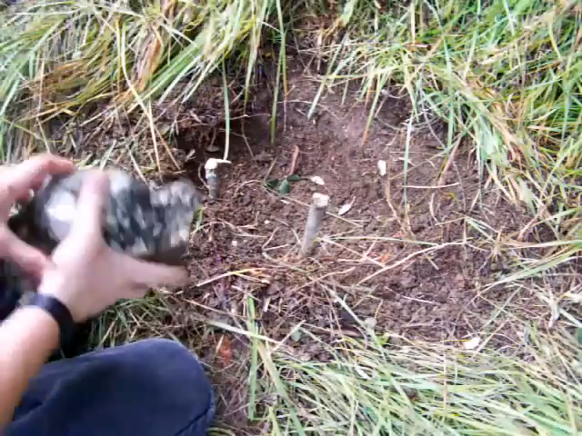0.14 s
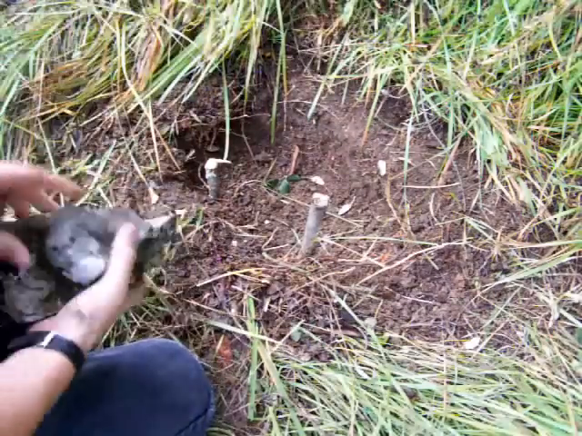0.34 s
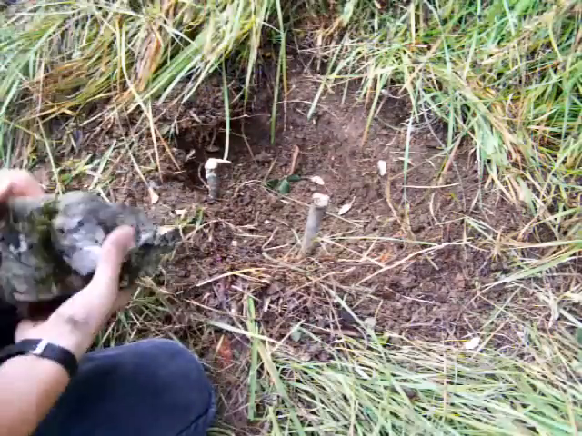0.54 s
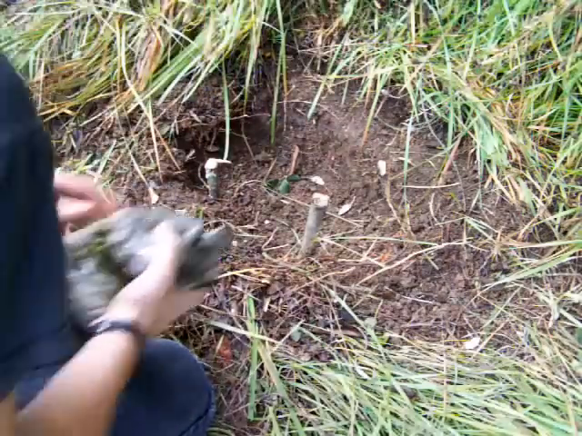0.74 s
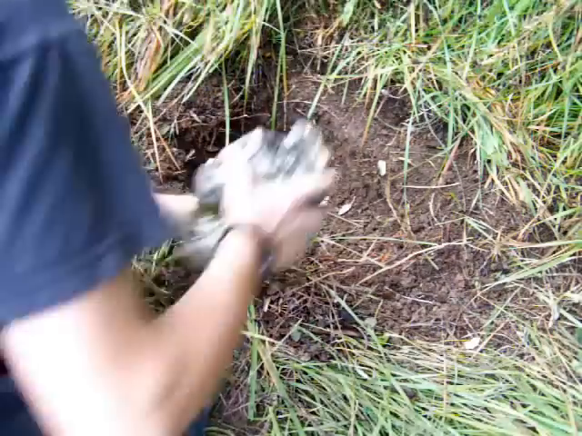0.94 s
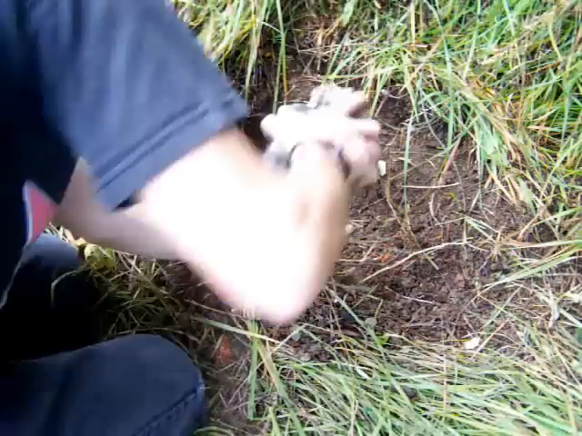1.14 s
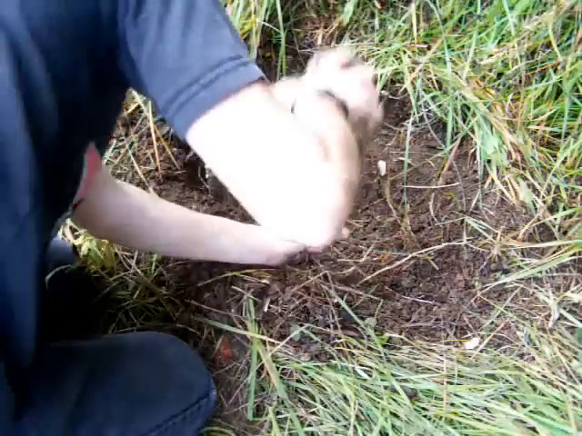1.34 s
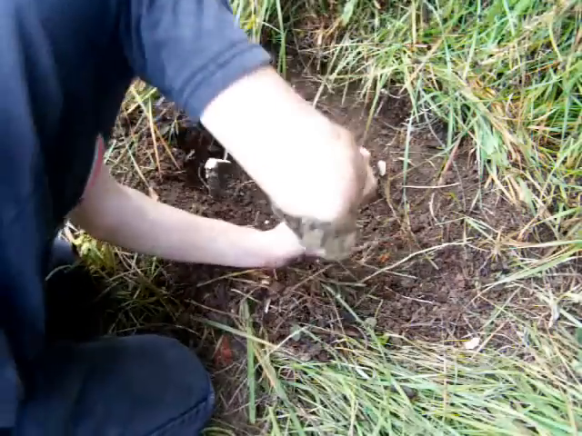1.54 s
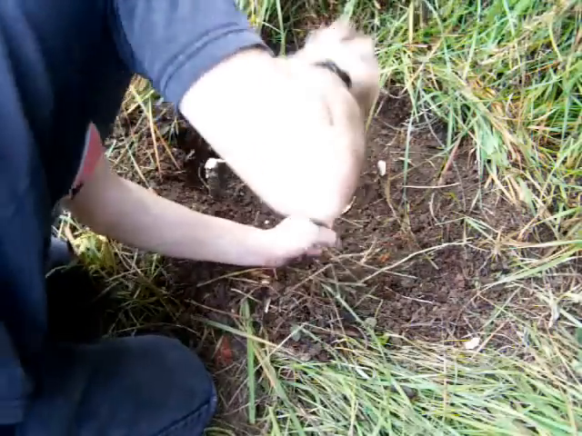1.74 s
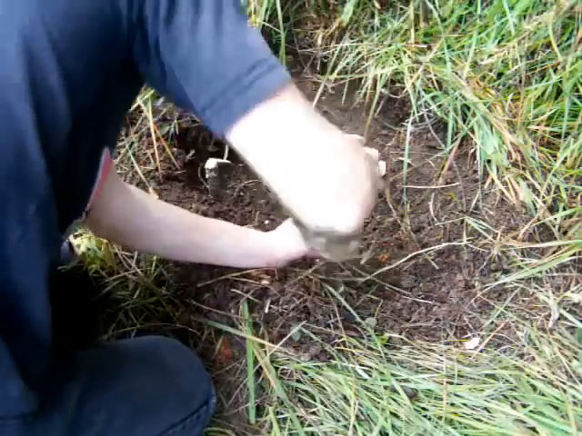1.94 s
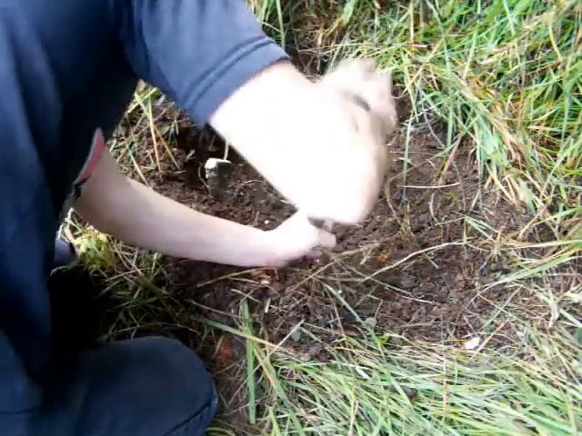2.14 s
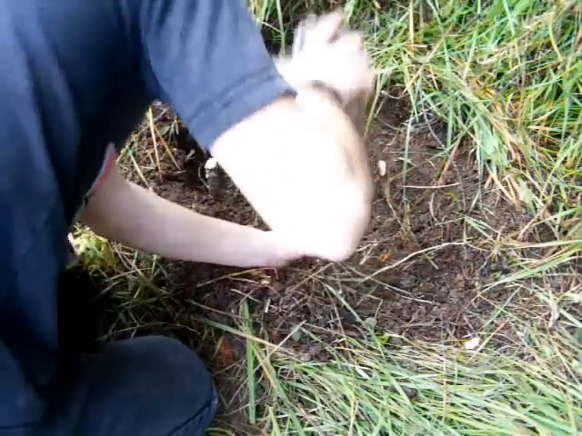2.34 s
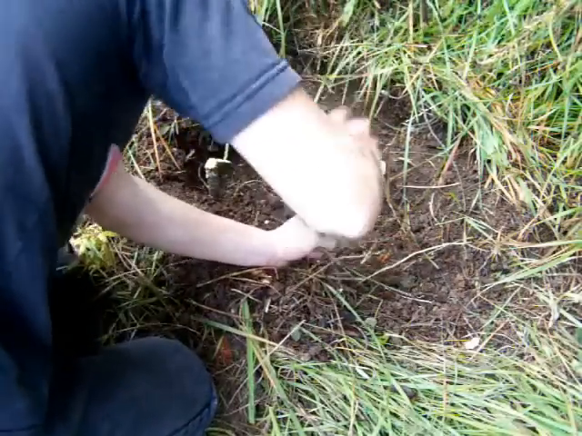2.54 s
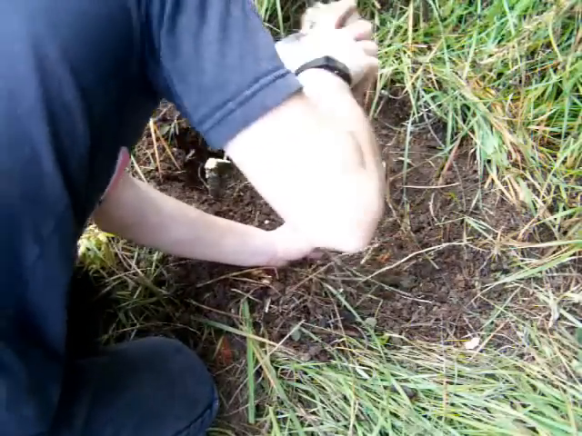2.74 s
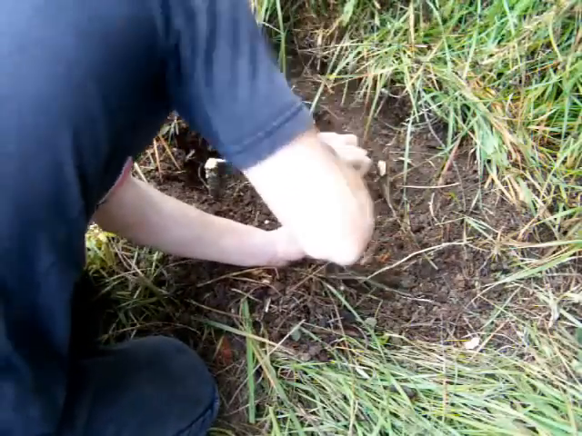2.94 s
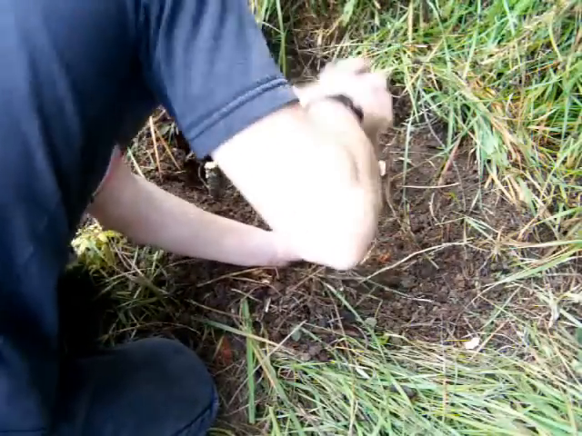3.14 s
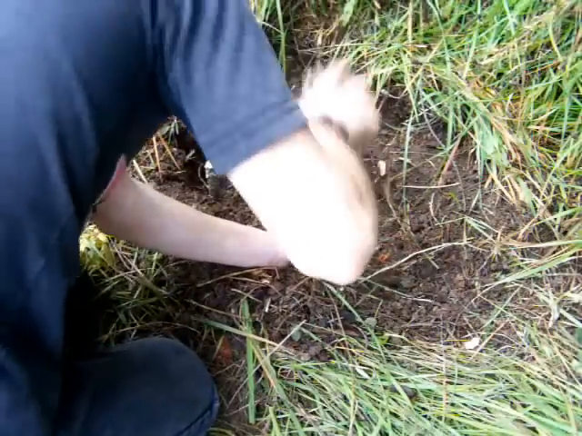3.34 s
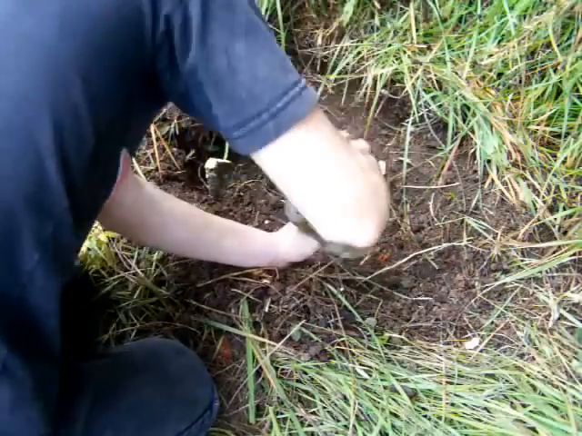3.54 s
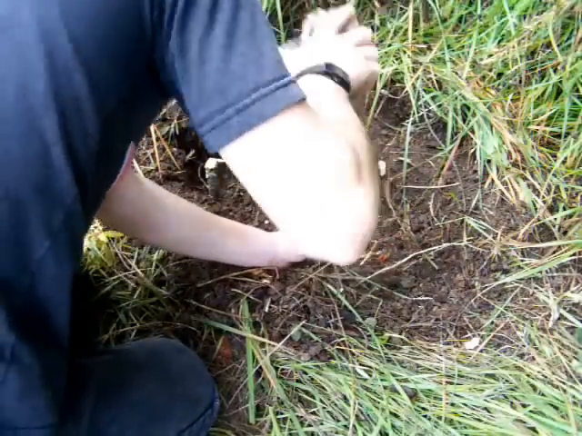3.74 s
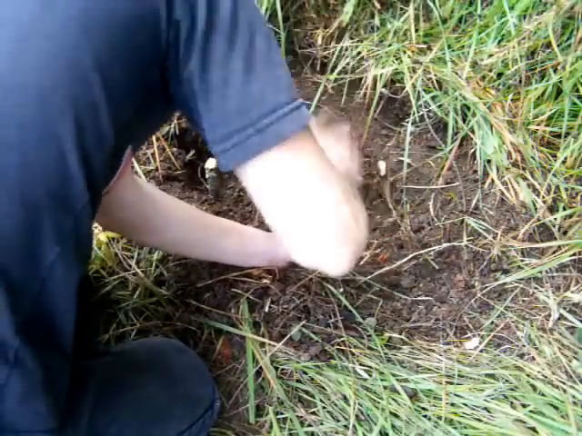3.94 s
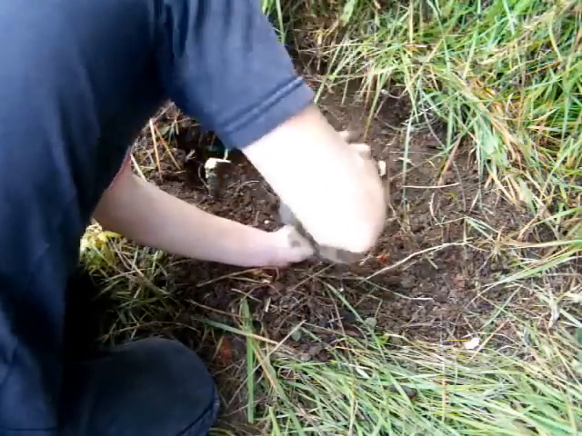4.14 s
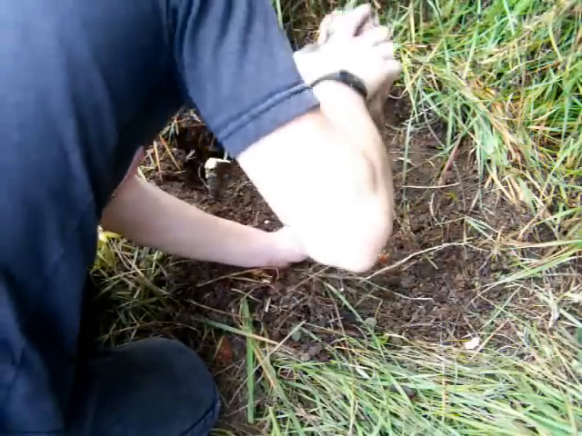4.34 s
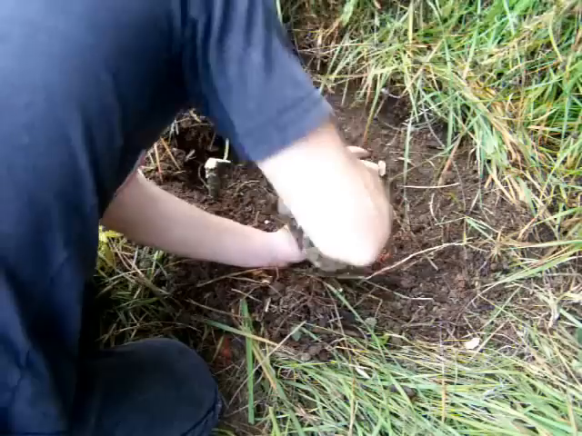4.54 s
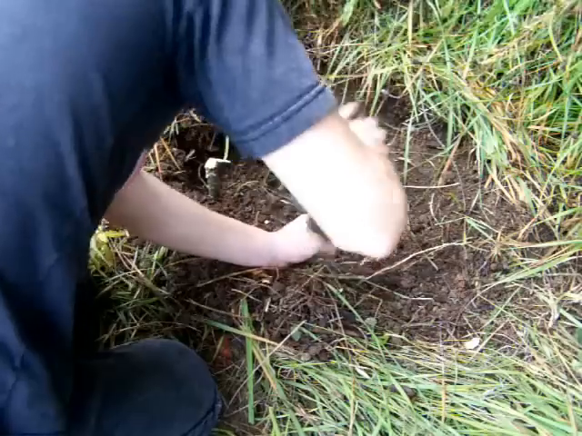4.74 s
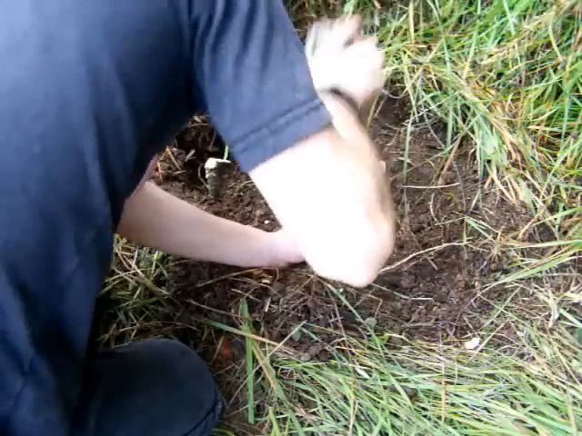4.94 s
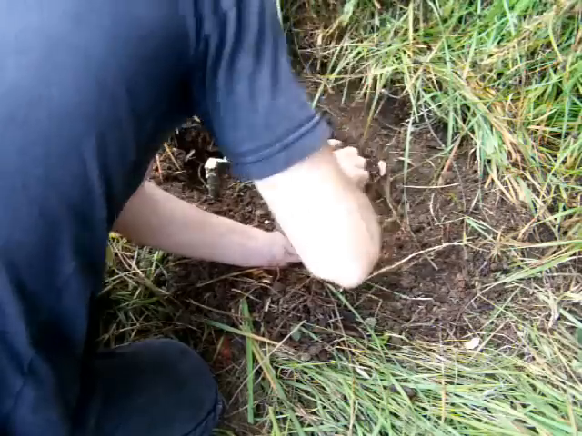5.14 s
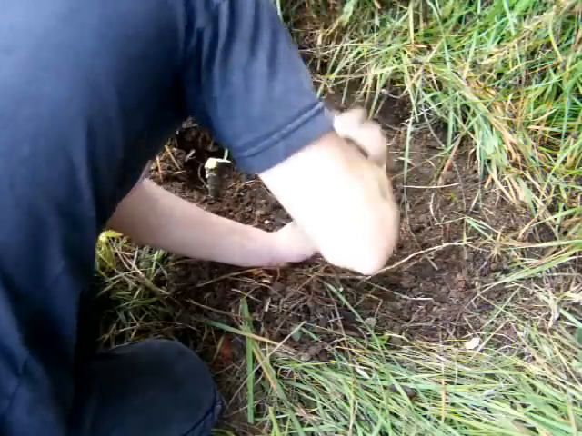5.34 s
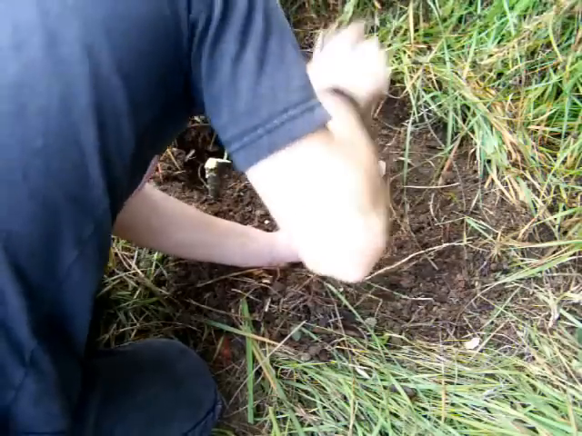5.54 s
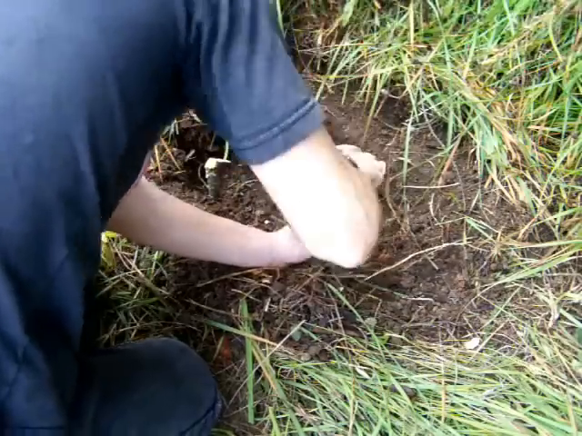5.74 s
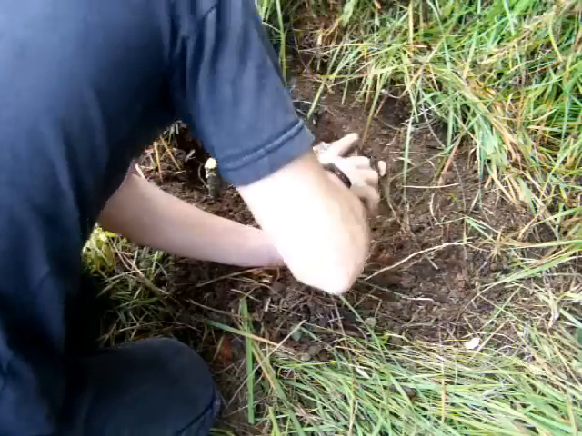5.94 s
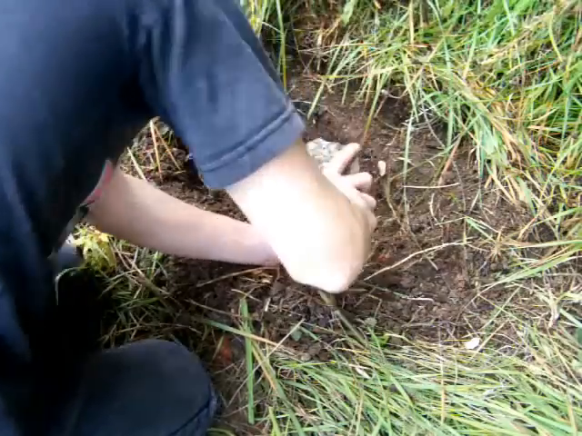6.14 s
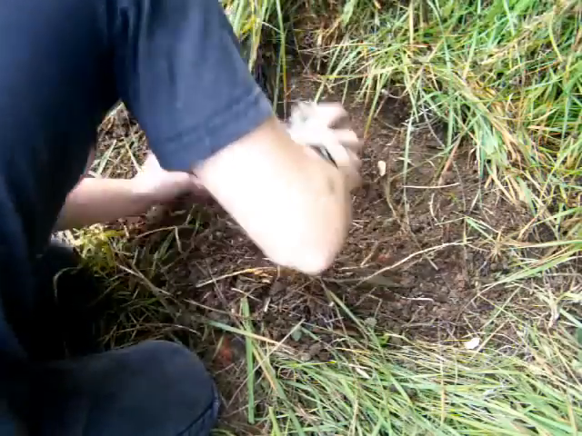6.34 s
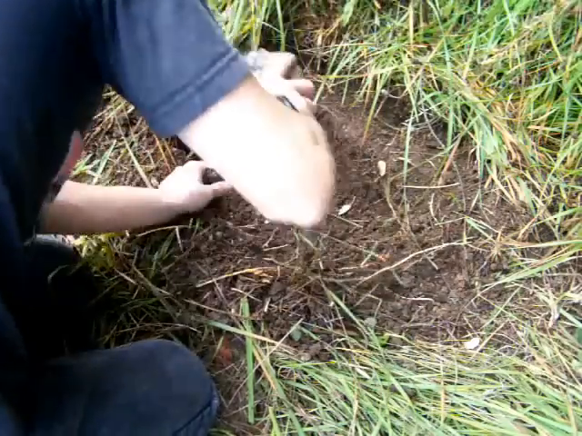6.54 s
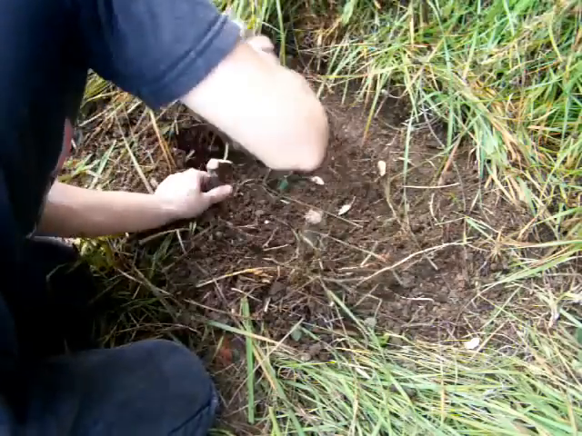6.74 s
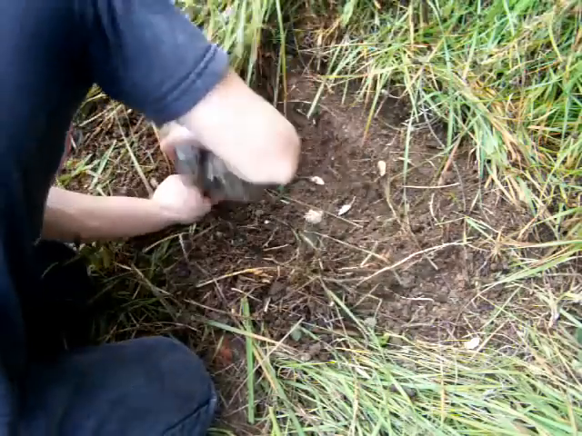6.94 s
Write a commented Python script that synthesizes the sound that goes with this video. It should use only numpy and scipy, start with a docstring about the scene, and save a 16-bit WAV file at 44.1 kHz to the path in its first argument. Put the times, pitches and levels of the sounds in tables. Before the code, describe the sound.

Close outdoor sound of a stone driving a wooden stake into soil. Grass and cloth rustle and dry stems snap first, then nine steady blows fall about half a second apart, each a splintery crack with a dull woody knock and short low thump. Rustling follows, a faint distant dove coos once, and one thinner blow ends it. Quiet rumble and leaf hiss lie underneath.

```python
"""A hand-held stone drives a short wooden stake into damp soil, outdoors, close to the microphone.
Each blow is a splintery crack (clicks ringing the stone), a dull knock and slower waves through the ground
(fading sines). Stems snap with short ticks and fizz. Grass rustles as tiny ringing clicks, and clothing as
filtered noise, when the arms move or a blow shakes the grass. A far dove coos once, a gliding sine,
over a quiet rumble and a hiss of leaves, both made of filtered noise."""
import sys
import numpy as np
from scipy import signal
from scipy.fft import rfft, irfft, next_fast_len
from scipy.io import wavfile

SR = 44100
rng = np.random.default_rng(int(sys.argv[2]) if len(sys.argv) > 2 else 0)


def inscribe(sig):
    """Save sig as 16-bit PCM at rate SR to the path in sys.argv[1].

    A 1-D sig is mono; a 2-D sig holds one channel per row.
    Samples are clipped to [-1, 1] before scaling.
    """
    pcm = np.round(np.clip(np.atleast_2d(sig).T, -1, 1) * 32767)
    wavfile.write(sys.argv[1], SR, pcm.astype(np.int16))


def decibels_to_gain(level_db):
    """Convert a level in decibels to a linear amplitude gain (20 dB per decade)."""
    exponent = np.asarray(level_db, float) / 20
    return 10 ** exponent


N = 308259   # length in samples, about 7 s

# far traffic and wind: (t/s, level/dB)
RUMBLE_LEVEL = [(0.0, -60), (0.43, -57), (1.26, -56), (1.5, -56.5), (3.5, -56.5), (6.99, -56.5)]
# tone colour of the outdoor air, relative: (f/Hz, level/dB per Hz)
AIR_COLOUR = [(15, -33.5), (25, -13.5), (49, 1), (81, 1.5), (212, -8.5), (411, -8), (1070, -17),
              (1980, -20), (2860, -22), (5540, -22), (7440, -28.5), (8210, -27), (8840, -49.5),
              (11500, -66)]
# grass brushed by an arm or shaken by a blow:
# (loudest t/s, level/dB, time to swell by 20 dB/ms, time to fade by 20 dB/ms)
GRASS_SWISHES = [(0.0, -43, 48, 298), (0.192, -43.5, 72, 28), (0.24, -48.5, 70, 110), (0.316, -48, 25, 200),
                 (0.432, -52.5, 40, 138), (0.56, -58, 40, 202), (0.81, -48.5, 84, 297),
                 (0.888, -40.5, 15, 11), (0.938, -38, 113, 207), (1.08, -50.5, 300, 900),
                 (1.388, -38, 33, 73), (1.469, -47, 11, 33), (1.632, -51.5, 160, 220), (1.71, -46, 8, 8),
                 (1.865, -43, 26, 95), (2.122, -51, 50, 65), (2.156, -49, 14, 8), (2.345, -47.5, 38, 112),
                 (2.424, -47.5, 48, 29), (2.596, -59.5, 35, 300), (2.84, -48.5, 23, 197),
                 (2.912, -51, 100, 46), (3.113, -60, 20, 150), (3.355, -51, 30, 100), (3.386, -51, 70, 35),
                 (3.418, -52.5, 15, 93), (3.636, -49, 8, 70), (3.918, -42.5, 20, 30),
                 (3.952, -40.5, 41, 29), (4.228, -55, 122, 9), (4.36, -57, 78, 8), (4.455, -46.5, 28, 155),
                 (4.684, -49, 20, 2), (4.74, -54.5, 8, 125), (4.868, -55, 80, 25), (5.025, -47, 30, 102),
                 (5.146, -56.5, 80, 700), (5.358, -59, 50, 56), (5.474, -50.5, 12, 20), (5.62, -46, 21, 41),
                 (5.693, -52, 110, 62), (5.84, -57.5, 45, 600), (5.965, -53.5, 300, 296),
                 (6.045, -49, 60, 400), (6.141, -44, 300, 111), (6.326, -49, 1, 16), (6.354, -39.5, 21, 50),
                 (6.41, -56.5, 100, 100), (6.562, -47.5, 7, 65), (6.75, -64, 600, 603),
                 (6.872, -52, 28, 202), (6.934, -43.5, 80, 92)]
# tone colour of rubbing grass, relative: (f/Hz, level/dB per Hz)
GRASS_COLOUR = [(880, -18.5), (1500, -12.5), (2320, -15.5), (4210, -7), (5420, -4.5), (6620, -10),
                (7510, -9), (8840, -5.5), (11500, -57.5), (19400, -120)]
# cloth moving: (t/s, level/dB)
CLOTH_LEVEL = [(0.0, -40.5), (0.068, -45.5), (0.26, -52.5), (0.4, -62), (0.52, -57), (0.7, -64),
               (0.82, -51.5), (1.242, -60.5), (1.4, -66.5), (4.97, -67.5), (5.19, -58.5), (5.44, -67.5),
               (5.9, -63), (6.08, -59), (6.3, -70), (6.99, -62.5)]
# tone colour of rubbing cloth, relative: (f/Hz, level/dB per Hz)
CLOTH_COLOUR = [(200, -11.5), (500, -5), (1150, -10.5), (1500, -7), (1800, -0.5), (2000, -4.5),
                (2200, -4.5), (2450, -7), (2800, -17.5), (3800, -3), (5000, -27)]
# stems and splinters snapping: (t/s, level/dB, f/Hz)
STEM_SNAPS = [(0.434, -35, 3790), (0.649, -36, 4300), (0.6787, -36, 3950), (0.6983, -36, 7150),
              (0.7085, -32, 5260), (0.7224, -39, 3520), (0.8113, -13.5, 4560), (0.8612, -25, 5000),
              (0.8874, -21, 4000), (0.9105, -29, 5510), (0.9346, -13, 5160), (0.9553, -30, 5600),
              (0.9705, -18, 5240), (1.011, -34, 4420), (1.1052, -25.5, 5200), (1.224, -37, 3750),
              (1.4695, -30.5, 4360), (1.6342, -27.5, 5400), (1.709, -34, 5880), (2.0993, -32.5, 5500),
              (2.121, -24, 5400), (2.1545, -35.5, 2750), (2.4197, -27, 3730), (2.5937, -35.5, 5600),
              (2.8198, -11, 3800), (2.8333, -18.5, 3860), (2.866, -26.5, 4230), (2.9058, -33, 3940),
              (3.1145, -38, 3580), (3.378, -28, 5400), (3.417, -34.5, 4200), (3.638, -36, 5500),
              (3.8985, -14.5, 2200), (3.8986, -14, 6000), (3.912, -16.5, 5800), (4.437, -10, 6200),
              (4.4895, -30, 5500), (4.6818, -38.5, 3180), (5.0076, -7.5, 4200), (5.0099, -11, 4600),
              (5.0364, -35, 3530), (5.0731, -32.5, 5220), (5.3607, -31.5, 4500), (5.5979, -12.5, 2960),
              (5.6056, -11.5, 7300), (5.6306, -28, 5580), (5.692, -33.5, 4140), (5.9588, -25, 5070),
              (6.0394, -25, 4300), (6.0852, -30, 4200), (6.1339, -26, 4930), (6.1695, -30, 5030),
              (6.324, -32.5, 5330), (6.351, -44, 4660), (6.8863, -29, 5470), (6.89, -27.5, 5470),
              (6.9085, -16, 4020)]
# wood fibres under the stone: (first touch t/s, delay of the tick/ms, tick level/dB, tick f/Hz,
# crunch strength/dB)
FIBRE_CRACKS = [(1.3753, 3.2, -16, 4200, -31.5), (1.8417, 1.46, 6, 3300, -22),
                (2.3241, 3.5, 0.5, 5600, -21.5), (2.8163, 0.88, 6, 2860, -17),
                (3.3326, 1.133, 2.5, 3230, -19.5), (3.894, 1.24, -13, 1640, -21),
                (4.434, 0.83, -2.5, 1320, -19.5), (5.0029, 0.4, -4, 1780, -17),
                (5.5964, 0.78, -3, 1310, -14.5), (6.8668, 2.6, -45, 5600, -49),
                (6.886, 4.7, -45, 5500, -39.5), (6.9045, 1.83, -7, 1920, -24)]
# tones of the stone, relative: (f/Hz, level/dB, time to fade by 60 dB/s)
STONE_MODES = [(1413, -2, 0.0019), (2210, -1.5, 0.002), (3750, 4.5, 0.0032), (5600, -1, 0.0031),
               (7660, -9, .003)]
# full blows: (t/s, knock strength/dB, knock f/Hz, ground strength/dB, contact time/ms)
FULL_BLOWS = [(1.3779, -8.8, 299, -7.4, 1.8), (1.8435, -5.8, 336, -8.7, 1.2),
              (2.3262, -5.6, 414, -8.9, 1.4), (2.8178, -5.8, 327, -5.3, .4), (3.3341, -3.4, 338, -5.1, .4),
              (3.8954, -5.5, 308, -2.9, .6), (4.4354, -5.1, 391, -4.9, .7), (5.0036, -5.1, 255, -5.1, 1.7),
              (5.5976, -5.2, 400, -3.8, .4), (6.9066, -7.7, 401, -13, 1.4)]
# the stone drops back: (t/s, knock strength/dB, ground strength/dB, contact time/ms)
STONE_REBOUNDS = [(2.4177, -35.5, -28.5, 1.5), (5.0620, -45, -15.5, 8.1), (5.6718, -16.5, -12.5, 0.26)]
# the stake's own slower wave, level relative to its push:
# (f/Hz, level/dB, time to fade by 60 dB/s, lag/ms, first swing +1 or -1)
STAKE_MODES = [(203, -3.6, .044, 1.28, -1)]
# still slower waves through the soil, which reach the microphone later, level relative to their push:
# (f/Hz, level/dB, time to fade by 60 dB/s, lag/ms, first swing +1 or -1)
GROUND_MODES = [(158, -10, .064, 2.33, -1), (77.5, -10.7, .08, 3.31, -1), (62.2, -8.4, .082, 4.22, 1)]


def rms_one(x):
    """Scale a sound so that its rms (average strength) is 1."""
    return x / np.sqrt(np.mean(x ** 2) + 1e-20)


def level_curve(rows):
    """Join the points (t/s, level/dB) with straight lines, one value per sample."""
    s, level_db = np.transpose(rows)
    return np.interp(np.arange(N) / SR, s, level_db)


def drift(rate_hz):
    """A smooth random wander of spread 1: noise through a low-pass filter, worked out every 40 samples."""
    pole = np.exp(-2 * np.pi * rate_hz * 40 / SR)
    noise = rng.standard_normal(N // 40 + 2002)
    slow = signal.lfilter([1], [1, -2 * pole, pole * pole], noise)[2000:]   # leave out the filter's start
    return np.interp(np.arange(N) / 40, np.arange(len(slow)), rms_one(slow - slow.mean()))


def ring(clicks, hz, t60):
    """Each click of height 1 sets off a sine of height 1 that fades by 60 dB in t60 seconds."""
    pole, turn = decibels_to_gain(-60 / (t60 * SR)), 2 * np.pi * hz / SR
    return signal.lfilter([0, np.sin(turn)], [1, -2 * pole * np.cos(turn), pole * pole], clicks + 1e-18)


def coloured(x, colour):
    """Shape the strength of each frequency, as an equaliser does; white noise keeps its rms."""
    hz, db = np.transpose(colour)
    size = next_fast_len(len(x))
    bins_hz = np.maximum(np.arange(size // 2 + 1) * SR / size, 1)
    gain = decibels_to_gain(np.interp(np.log(bins_hz), np.log(hz), db))
    return irfft(rfft(x, size) * rms_one(gain), size)[:len(x)]


def grains(length, per_s, spread_db):
    """Random clicks of very uneven size and either sign, like many tiny breaks; rms 1."""
    sizes = decibels_to_gain(spread_db * np.minimum(rng.exponential(1, length), 5))
    signs = rng.choice([-1, 1], length)
    return rms_one(sizes * signs * (rng.random(length) < per_s / SR))


def add(out, s, piece):
    """Mix a short sound into out, starting at s seconds."""
    i = round(s * SR)
    out[i:i + len(piece)] += piece[:N - i]


def air():
    """A nearly steady hiss of leaves over an unrelated low rumble that comes and goes."""
    air_db = -55.5   # low and high part together, before the low part is replaced by the rumble
    parts = []
    for kind in ("low", "high"):
        split = signal.butter(2, 300, kind, fs=SR, output="sos")
        noise = rms_one(coloured(rng.standard_normal(N), AIR_COLOUR))
        parts.append(signal.sosfilt(split, noise))
    low, high = parts
    rumble = decibels_to_gain(level_curve(RUMBLE_LEVEL) + 1.1 * drift(5.2)) * rms_one(low)
    leaves = decibels_to_gain(air_db + 0.73 * drift(0.83)) * high
    return rumble + leaves


def dove():
    """One soft, nearly pure note that arches in pitch and level."""
    start_s, length_s = 5.805, .205
    end_db, swell_db = -66, 4     # level at both ends, rise to the middle
    end_hz, arch_hz = 600, 53.3   # pitch at both ends, rise to the middle
    since = np.arange(N) / SR - start_s
    arch = np.sin(np.pi * np.clip(since / length_s, 0, 1))
    gate = np.clip(np.minimum(since, length_s - since) / 0.013, 0, 1)   # 13 ms fades, silence outside
    phase = 2 * np.pi * np.cumsum(end_hz + arch_hz * arch) / SR
    return np.sqrt(2) * gate * decibels_to_gain(end_db + swell_db * arch) * np.sin(phase)   # sqrt(2): levels are rms


def swishing():
    """Strength of the grass: each swish swells and fades evenly in dB; overlapping ones add in power."""
    resting_db = -73.5   # grass left alone
    steps = np.arange(0, N + 40, 40)
    power = decibels_to_gain(resting_db) ** 2
    for s, db, swell_ms, fade_ms in GRASS_SWISHES:
        since_ms = (steps / SR - s) * 1000
        drop_db = 20 * np.maximum(-since_ms / swell_ms, since_ms / fade_ms)
        power = power + decibels_to_gain(db - drop_db) ** 2
    return np.interp(np.arange(N), steps, np.sqrt(power))


def rustle():
    """Blades rub in clumps of tiny clicks, each blade size with its own pitch; cloth gives a duller swish."""
    shared, blades = drift(45), 0
    for hz in np.geomspace(2500, 8200, num=9):
        clumps = decibels_to_gain(2.0 * shared + 3.0 * drift(30))
        clicks = clumps * grains(N, 1500, spread_db=2.0)
        blade = ring(clicks, hz, 4.6 / hz)   # fades by 60 dB in 4.6 cycles
        blades = blades + rms_one(blade) * np.sqrt(hz)
    grass = swishing() * rms_one(coloured(blades, GRASS_COLOUR))
    moving = decibels_to_gain(level_curve(CLOTH_LEVEL) + 1.8 * drift(25))
    cloth = moving * rms_one(coloured(rng.standard_normal(N), CLOTH_COLOUR))
    return grass + cloth


def snaps():
    """Something dry breaks: a few cycles at its own pitch and a short fizz; faint ones come at random."""
    faint_per_s, faint_db = 2, -42          # faint levels spread 4 dB either way
    usual_cycles, cycles_per_db = 10.3, -.2   # cycles to fade by 60 dB at -30 dB; harder breaks ring shorter
    out, t = np.zeros(N), np.arange(round(.03 * SR)) / SR
    faint = []
    for when, loudness, pitch in rng.random((round(faint_per_s * N / SR), 3)):
        faint.append((when * N / SR, faint_db + 8 * (loudness - .5), 3500 * 2 ** pitch))
    for s, level_db, hz in STEM_SNAPS + faint:
        cycles = usual_cycles + cycles_per_db * (level_db + 30)
        tick = np.sin(2 * np.pi * hz * t) * decibels_to_gain(-60 * t * hz / cycles)
        noise = rng.standard_normal(len(t)) * decibels_to_gain(-60 * t / 0.012)
        fizz = np.diff(noise, prepend=0)   # differences make the noise bright
        add(out, s, decibels_to_gain(level_db) * (1.18 * tick + 0.42 * fizz))
    return out


def cracks():
    """Fibres crackle from first touch, the stone's edge ticks, and the crushing rings the stone in clumps."""
    # light crushing is bright (dB per octave); above heavy_db each dB dulls it by so many dB per octave
    light_tilt_db, heavy_db, dulling = 2.5, -20.5, 1.5
    out, t = np.zeros(N), np.arange(round(.1 * SR)) / SR
    for s, tick_ms, tick_db, tick_hz, crunch_db in FIBRE_CRACKS:
        tilt_db = light_tilt_db - dulling * max(crunch_db - heavy_db, 0)
        since = t - tick_ms / 1000
        after = np.maximum(since, 0)
        # the tick fades by 60 dB in 3.86 cycles
        tick = -np.sin(2 * np.pi * tick_hz * after) * decibels_to_gain(tick_db - 60 * after * tick_hz / 3.86)
        # crushing is even until the tick, then dies away fast with a weaker, longer tail
        dying = decibels_to_gain(-60 * after / 0.023) + decibels_to_gain(-18.0 - 60 * after / 0.11)
        crush = np.where(since < 0, decibels_to_gain(-1.0), dying)
        fibres = 0
        for hz, level_db, t60 in STONE_MODES:   # every mode is struck by grains of its own
            clicks = crush * grains(len(t), 4000, spread_db=4.0)
            mode_db = level_db + tilt_db * np.log2(hz / 3000) - 11.5
            fibres = fibres + decibels_to_gain(mode_db) * ring(clicks, hz, t60)
        add(out, s, tick + decibels_to_gain(crunch_db) * fibres)
    return out


def thuds():
    """Every blow knocks the stake's head and pushes the same modes below it; a longer contact sounds duller."""
    knock_db, knock_t60_s = 4.4, .011
    # a glancing blow knocks higher and drives the stake less:
    # the stake is pushed as hard as the knock at square_hz, then changes by so many dB per octave
    square_hz, glance_db_per_oct = 325, -10.5
    rebound_hz, rebound_stake_db = 262, -4.5   # stake push against the knock
    hits = []
    for s, db, hz, ground_db, contact_ms in FULL_BLOWS:
        stake_db = db + glance_db_per_oct * np.log2(hz / square_hz)
        hits.append((s, db, hz, stake_db, ground_db, contact_ms))
    for s, db, ground_db, contact_ms in STONE_REBOUNDS:
        hits.append((s, db, rebound_hz, db + rebound_stake_db, ground_db, contact_ms))

    out, t = np.zeros(N), np.arange(-200, round(.2 * SR)) / SR   # starts early to leave room for the contact
    for s, head_db, head_hz, stake_db, ground_db, contact_ms in hits:
        body, head = 0, [(head_hz, knock_db, knock_t60_s, 0, 1)]
        for push_db, modes in [(head_db, head), (stake_db, STAKE_MODES), (ground_db, GROUND_MODES)]:
            for hz, level_db, t60, lag_ms, swing in modes:
                since = np.maximum(t - lag_ms / 1000, 0)
                fading = decibels_to_gain(push_db + level_db - 60 * since / t60)
                body = body + swing * fading * np.sin(2 * np.pi * hz * since)
        # one smooth push as long as the contact smears the body's sound
        force = np.cos(np.pi * np.clip(t[:401] * 1000 / contact_ms, -.5, .5)) ** 2
        add(out, s + t[0], np.convolve(body, force / force.sum(), "same"))
    return out


def scene():
    """All sources in one microphone."""
    return (thuds() + cracks() + snaps() + rustle() + dove() + air())[None]


def roll_off(x):
    """The treble ends steeply here."""
    return signal.sosfilt(signal.butter(12, 8990, fs=SR, output="sos"), x)


def record(dry):
    """Peaks overload the input and are flattened, then the top of the treble is cut."""
    limit, stop_hz = .63, 9434   # largest height; from stop_hz up the filter takes off at least 60 dB
    clipped = dry / (1 + np.abs(dry / limit) ** 12) ** (1 / 12)
    low_pass = signal.cheby2(10, 60, stop_hz, fs=SR, output="sos")
    finished = signal.sosfilt(low_pass, clipped)
    return roll_off(finished)


dry = scene()
out = record(dry)
inscribe(out)
```